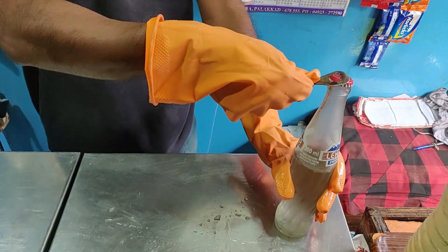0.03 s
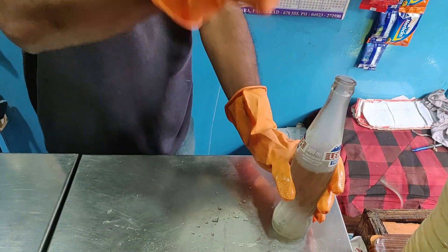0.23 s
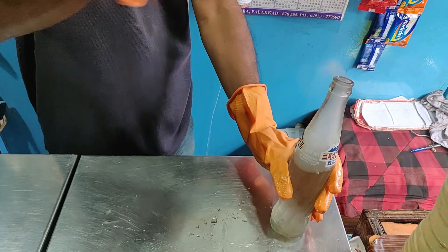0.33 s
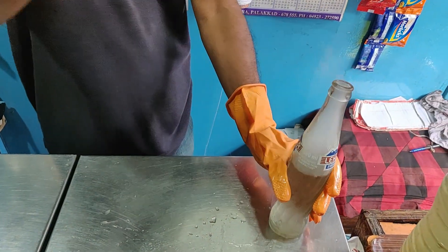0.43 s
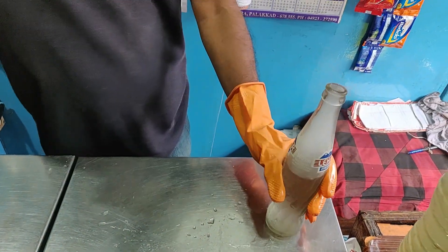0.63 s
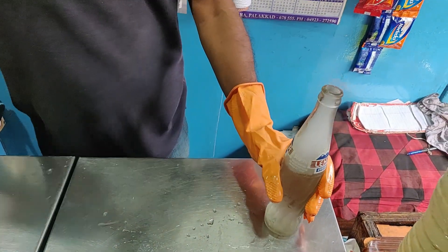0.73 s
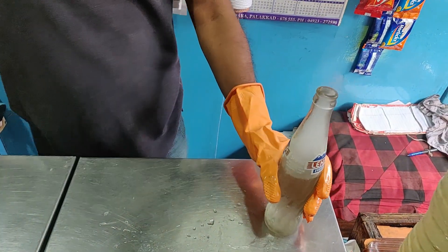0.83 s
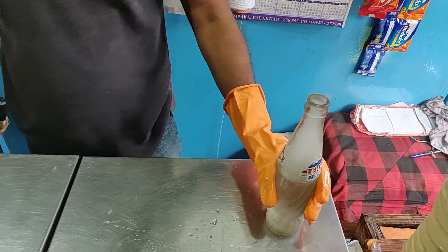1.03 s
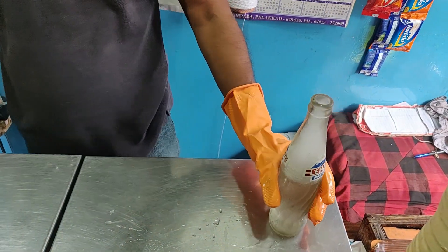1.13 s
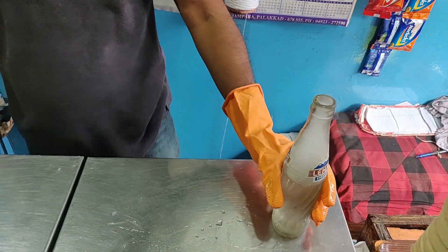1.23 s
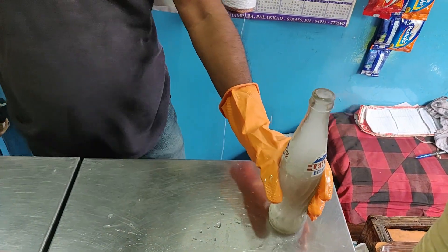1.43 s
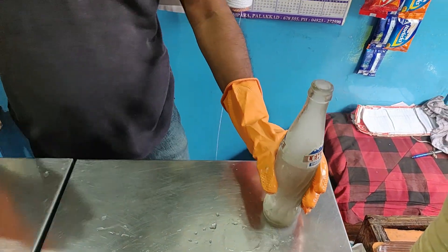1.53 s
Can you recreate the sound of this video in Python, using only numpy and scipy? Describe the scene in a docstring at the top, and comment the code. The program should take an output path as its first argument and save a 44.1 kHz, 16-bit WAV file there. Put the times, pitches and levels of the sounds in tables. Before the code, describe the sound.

A glass soda bottle pops open: gas hisses from the start and swells until a sharp, hollow pop at about 0.25 seconds. The metal cap bounces with light, ringing clinks from 0.35 to 0.6 seconds. Around 1.3 seconds the opener clatters onto a hard counter with a soft low bump, ending in faint taps by 1.6 seconds. Machines hum quietly throughout in a small, slightly reverberant shop.

```python
"""In a small shop, a crown cap is levered off a glass soda bottle.
Gas hisses past the seal as a turbulent jet and swells; the sudden release cracks, and the air in
the neck resonates with a hollow pop. The cap clinks down in a few bounces, ringing in its modes.
A second later the opener clatters onto a hard surface and sets it vibrating.
The room reverberates briefly, and machines hum in the background."""
import sys
import numpy as np
from scipy import signal
from scipy.fft import rfft, irfft
from scipy.io import wavfile
from scipy.ndimage import uniform_filter1d

SR = 44100
rng = np.random.default_rng(int(sys.argv[2]) if len(sys.argv) > 2 else 0)


def generate_wav(signal):
    """Clip the signal to [-1, 1] and save it as 16-bit WAV at the path in sys.argv[1]."""
    frames = np.transpose(np.atleast_2d(signal))
    scaled = np.clip(frames, -1, 1) * 32767
    pcm = np.round(scaled).astype(np.int16)
    wavfile.write(sys.argv[1], SR, pcm)


N = 70560
T = np.arange(N) / SR
POP_S = 0.2335
SINCE_POP = np.maximum(T - POP_S, 0)

# Envelope of the air resonance in the neck: t/s, level/dB
NECK_ENVELOPE = [(.2325, -37), (0.2317, -9), (0.237, -1), (0.25, -24.5), (0.25, -4), (0.277, -12.5),
                 (.297, -11.5), (0.301, -24.5), (.36, -24.5), (.425, -36.5)]
def neck_tone():
    """Helmholtz resonance: air bounces in the neck; the pitch leaps as the mouth clears, then sags."""
    rise = -163 * np.exp(-SINCE_POP / 0.007)
    overshoot = 46.3 * np.exp(-SINCE_POP / 0.028)
    hz = 283 + rise + overshoot
    times, db = np.transpose(NECK_ENVELOPE)
    release_db = 177 * np.maximum(T - times[-1], 0)
    envelope = from_db(np.interp(T, times, db) - release_db)
    envelope = uniform_filter1d(envelope, int(0.0018 * SR))
    return envelope * sine(hz * (T >= POP_S))

def neck_overtone():
    """Damped oscillation: a higher air resonance slides down as the cap lifts clear, and dies fast."""
    hz = 613 + 192 * np.exp(-SINCE_POP / 0.0035)
    return from_db(-16.5) * decay(POP_S, t60=0.13) * sine(hz * (T >= POP_S))

# Spectra of the crack and of the last puff of gas: f/Hz, relative density level/dB
CRACK_SPECTRUM = [(70, -28), (110, -16), (180, -10), (400, 1.5), (560, -9), (900, -6), (1300, -20),
                  (2400, -14), (5600, -38), (7000, -42), (16000, -49)]
PUFF_SPECTRUM = [(600, -20), (1100, 4), (1600, 0.5), (2500, 1), (3400, -3.5), (4200, 0), (5600, -12),
                 (7000, -6.5), (16000, -38)]
# Modes of the bottle: f/Hz, level/dB, T60/s
BOTTLE_MODES = [(214, -23.5, 0.21), (903, -36, 0.13), (995, -29, 0.19), (2260, -56, 0.09),
                (3960, -41.5, 0.26)]
def crack():
    """Impulse excitation: the sudden release cracks, rings the bottle and lets out a puff of gas."""
    release = [(POP_S, 0)]
    puff = from_db(-27) * bursts(release, PUFF_SPECTRUM, t60=0.16)
    snap = from_db(-14.5) * bursts(release, CRACK_SPECTRUM, t60=0.043)
    return puff + snap + ring(release, BOTTLE_MODES, spread_db=2.5)

def mouth(x):
    """Radiation from a small opening: the narrow mouth of the bottle gives out little deep bass."""
    return signal.sosfilt(signal.butter(2, 138, "high", fs=SR, output="sos"), x)

# Envelope of the gas leak: t/s, level/dB
LEAK_ENVELOPE = [(0, -34.5), (.075, -36), (.09, -32.5), (.188, -34.5), (.222, -26.5), (.235, -28),
                 (.243, -48), (.27, -73)]
# Spectrum of the jet: f/Hz, relative density level/dB
JET_SPECTRUM = [(150, 2.5), (380, 19), (600, -1.5), (1100, 5.5), (2200, -3), (3500, -4.5), (5200, -8),
                (6800, -6.5), (8500, -19), (9700, -4.5), (11000, -3), (13500, -2), (15200, -2.5)]
def hiss():
    """Turbulent jet noise: gas escapes under the cap, hardest just before the seal lets go."""
    level_db = np.interp(T, *np.transpose(LEAK_ENVELOPE))
    return from_db(level_db) * noise(JET_SPECTRUM, flutter_db=1.65)

# Bounces of the cap: t/s, relative tick level/dB, relative ring level/dB
CAP_BOUNCES = [(0.356, -7.5, -22), (0.3643, 0.5, -14.5), (0.3679, -5.5, -1), (.4528, -4, -5.5),
               (0.46, -2.5, -3), (0.4635, -9, -8), (0.5901, -14, -42), (0.597, -11, -42)]
# Spectrum of a tick: f/Hz, relative density level/dB
TICK_SPECTRUM = [(300, -20), (520, 2.5), (800, 2.5), (1300, 2.5), (2000, -4.5), (2900, -3), (3900, -7),
                 (5600, 3), (7200, -57), (10000, -16), (12500, -20), (15200, -22)]
# Modes of the cap: f/Hz, relative level/dB, T60/s
CAP_SHELL_MODES = [(717, -20.5, 0.033), (2780, -28.5, 0.045), (4600, -39, 0.076), (5030, -35, 0.11),
                   (5300, -31.5, 0.068), (5450, -28, 0.038), (5620, -22, 0.086), (5850, -31, 0.052),
                   (6000, -35, 0.05), (9700, -31, .01), (10000, -25.5, 0.016), (11720, -30, 0.016),
                   (12500, -36, .014), (13800, -40, .016), (14800, -30, .015), (15400, -28, .02)]
def cap():
    """Free vibration of a shell: the steel cap ticks at each bounce and rings when it lands hard."""
    ticks = bursts([(s, db) for s, db, _ in CAP_BOUNCES], TICK_SPECTRUM, t60=0.027)
    rings = ring([(s, db) for s, _, db in CAP_BOUNCES], CAP_SHELL_MODES, spread_db=1, detune=0.0046)
    return from_db(-24.5) * ticks + from_db(-9.5) * rings

# Contacts of the opener: t/s, relative clack level/dB, relative surface level/dB
OPENER_CONTACTS = [(1.2690, -25, -18), (1.2790, -3.5, -11), (1.2855, -8.5, -9.5), (1.3039, -2.5, 0),
                   (1.3077, -7, -10), (1.314, -11.5, -12), (1.3192, -9.5, -10), (1.329, -21, -20),
                   (1.3727, -16, -18), (1.39, -14, -13), (1.5047, -17, -18), (1.508, -19, -21),
                   (1.5804, -21.5, -14), (1.595, -18, -24)]
# Spectrum of a knock: f/Hz, relative density level/dB
KNOCK_SPECTRUM = [(100, -39), (220, -6.5), (430, 1), (700, -6.5), (1100, -8), (1750, -8.5), (2700, -14),
                  (3400, -21.5), (5200, -20), (7000, -33), (9500, -33), (15000, -32.5)]
# Modes of the opener and of the surface under it: f/Hz, relative level/dB, T60/s
OPENER_BODY_MODES = [(906, -26.5, 0.093), (1246, -39.5, 0.21), (1334, -31, 0.16), (1600, -38, 0.059),
                     (1800, -35, 0.048), (2160, -56, 0.11), (2734, -37.5, 0.1), (4830, -38, 0.047)]
HARD_SURFACE_MODES = [(221, -32.5, 0.1), (300, -25, .14), (401, -19, 0.064), (469, -19.5, 0.03),
                      (684, -25.5, .07), (768, -23.5, 0.045)]
def opener():
    """Impact excites both bodies: the opener lands end after end and rattles; the surface booms."""
    clacks = [(s, db) for s, db, _ in OPENER_CONTACTS]
    loads = [(s, db) for s, _, db in OPENER_CONTACTS]
    knocks = from_db(-13.5) * bursts(clacks, KNOCK_SPECTRUM, t60=0.053)
    boom = ring(loads, HARD_SURFACE_MODES, spread_db=0.5, detune=0.014)
    rings = from_db(1.5) * ring(clacks, OPENER_BODY_MODES, spread_db=2)
    return knocks + boom + rings

def thud():
    """A single damped mode: a soft, low bump just after the opener lands."""
    start_s, hz, db, t60 = 1.384, 127, -18.5, 0.07
    return ring([(start_s, 0)], [(hz, db, t60)], spread_db=0)

# Tones of the machines: f/Hz, rms level/dB
MACHINE_TONES = [(60.5, -44), (148, -49), (335, -48.5), (412, -51), (735, -53.5), (1025, -56.5)]
# Spectrum of the background noise: f/Hz, relative density level/dB
SHOP_SPECTRUM = [(25, -1.5), (45, -30), (60, -10.5), (90, -1.5), (150, -5), (255, -14), (335, -4),
                 (420, -9.5), (520, -15.5), (750, -11.5), (1400, -21), (2100, -21), (3300, -31),
                 (5600, -39.5), (7300, -53.5), (14500, -50)]
def shop():
    """Random modulation: machine tones waver over steady noise; the low rumble dips briefly."""
    hum = np.zeros(N)
    for hz, db in MACHINE_TONES:
        amplitude = np.sqrt(2) * from_db(db + 3.5 * drift(rate_hz=4.1))
        hum += amplitude * sine(hz + 2.69 * drift(rate_hz=6.65))
    background = hum + from_db(-34.5) * noise(SHOP_SPECTRUM, flutter_db=1.64)
    rumble = signal.sosfiltfilt(signal.butter(2, 210, fs=SR, output="sos"), background)
    dip_db = -6.5 * np.exp(-((T - 0.42) / 0.15) ** 2)
    return background + (from_db(dip_db) - 1) * rumble

# Reverberation time of the shop: f/Hz, T60/s
REVERB_TIMES = [(200, 0.77), (1000, 0.13), (5000, 0.26), (10000, 0.19), (15000, 0.3)]
def room(x):
    """Reverberation: dense reflections decay exponentially, lasting longest in the bass."""
    gap_s = 0.0066
    tail = sum(band * decay(gap_s, at_hz(REVERB_TIMES, hz)) for hz, band in noise_bands())
    return signal.fftconvolve(x, unit_rms(tail) / np.sqrt(N), axes=1)[:, :N]

def bursts(hits, spectrum, t60):
    """Incoherent addition: contacts give damped noise bursts whose powers add."""
    power = np.zeros(N)
    for s, db in hits:
        rise_s = 0.00024 * from_db(-0.62 * db)  # light contacts build up more slowly
        attack = np.clip((T - s) / rise_s, 0, 1)
        power += (from_db(db) * attack * decay(s, t60)) ** 2
    return noise(spectrum) * np.sqrt(power)

def ring(hits, modes, spread_db, detune=0):
    """Modal superposition: each contact strikes every mode with random strength, sign and mistuning."""
    out = np.zeros(N)
    for s, db in hits:
        start = int(s * SR)
        age = T[:min(N - start, SR // 2)]
        for hz, mode_db, t60 in modes:
            strength, shift = rng.standard_normal(2)
            envelope = from_db(db + mode_db + spread_db * strength - 60 * age / t60)
            wave = np.sin(2 * np.pi * hz * (1 + detune * shift) * age)
            out[start:start + len(age)] += np.sign(strength) * envelope * wave
    return out

def noise(spectrum, flutter_db=0):
    """Spectral shaping: weighted, optionally fluttering bands sum to stereo noise of rms 1."""
    bands = (band * from_db(at_hz(spectrum, hz) + flutter_db * drift(rate_hz=9))
             for hz, band in noise_bands())
    return unit_rms(sum(bands))

# Likeness of left and right: f/Hz, correlation coefficient
STEREO_CORRELATION = [(60, 0.98), (300, 0.68), (600, 0.36), (1100, 0), (4000, 0.00024), (15000, 0)]
def noise_bands():
    """Spatial coherence: third-octave noise bands, alike on both sides in the bass, not the treble."""
    edges = np.geomspace(22, 18000, 30)
    white = rng.standard_normal((2, 2, N))
    for k, (low, high) in enumerate(zip(edges, edges[1:])):
        bandpass = signal.butter(2, [low, high], "band", fs=SR, output="sos")
        mid, side = signal.sosfilt(bandpass, white[k % 2])
        hz = np.sqrt(low * high)
        alike = at_hz(STEREO_CORRELATION, hz)
        yield hz, np.sqrt(1 + alike) * mid + np.sqrt(1 - alike) * side * [[1], [-1]]

def drift(rate_hz):
    """Low-passed noise: slow random motion of rms 1."""
    step, warm_up = 40, 2000  # samples
    pole = np.exp(-2 * np.pi * rate_hz * step / SR)
    white = rng.standard_normal(N // step + warm_up + 2)
    slow = signal.lfilter([1], [1, -2 * pole, pole ** 2], white)[warm_up:]
    return np.interp(np.arange(N) / step, np.arange(len(slow)), unit_rms(slow))

def decay(start, t60):
    """Exponential decay: a jump to 1, then a fall of 60 dB every t60 seconds."""
    return (T >= start) * from_db(-60 * np.clip((T - start) / t60, 0, 5))

def sine(hz):
    """A sinusoid whose phase is the integral of its frequency."""
    return np.sin(2 * np.pi * np.cumsum(hz) / SR)

def at_hz(points, hz):
    """Interpolation on a log-frequency axis."""
    f, value = np.transpose(points)
    return np.interp(np.log(hz), np.log(f), value)

def from_db(db):
    """Level to amplitude ratio."""
    return 10 ** (np.asarray(db) / 20)

def unit_rms(x):
    """Normalisation to rms 1."""
    return x / np.sqrt(np.mean(x ** 2) + 1e-20)

def scene():
    """Superposition: the direct sound and reverberation of each event add to the background."""
    sources = [  # signal, level sent to the room/dB
        (hiss(), -7.5),
        (mouth(neck_tone() + neck_overtone()), -41),
        (mouth(crack()), -12),
        (cap(), -3.5),
        (opener(), -4),
        (thud(), -16.5),
    ]
    direct = sum(x for x, _ in sources)
    into_room = sum(x * from_db(db) for x, db in sources)
    return shop() + direct + room(into_room)

# Colour difference of the two microphone ports: f/Hz, left minus right level/dB
PORT_BALANCE = [(60, 5.5), (300, 3.5), (700, 3.5), (1300, 0.5), (3700, -2.5), (4600, -8), (5700, -13.5),
                (6900, -1.5), (8600, 3), (10500, -1.5), (15000, -2.5)]
def record(dry):
    """Frequency response and clipping: each port colours the sound; peaks and top treble are cut."""
    hz = np.maximum(np.arange(N + 1) * SR / (2 * N), 1)
    ports = from_db(at_hz(PORT_BALANCE, hz) * np.array([[0.5], [-0.5]]))
    coloured = irfft(rfft(dry, 2 * N) * ports)[:, :N]
    lowpass = signal.ellip(10, 0.3, 70, 15800, fs=SR, output="sos")
    return signal.sosfilt(lowpass, np.clip(coloured, -0.9, 0.9))

dry = scene()
out = record(dry)
generate_wav(out)
```